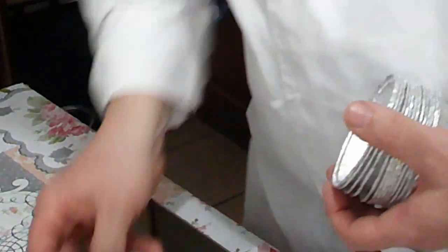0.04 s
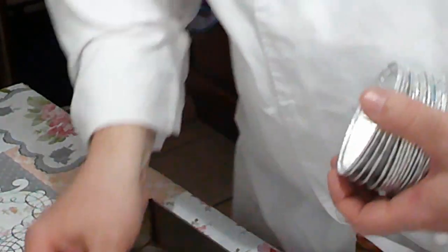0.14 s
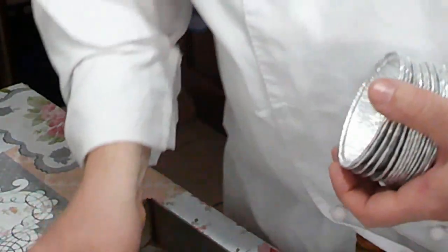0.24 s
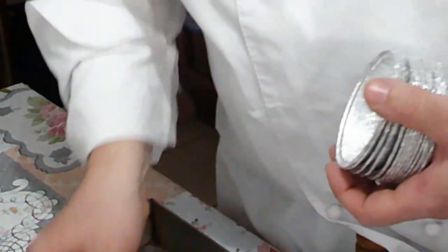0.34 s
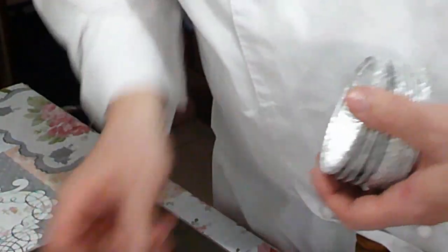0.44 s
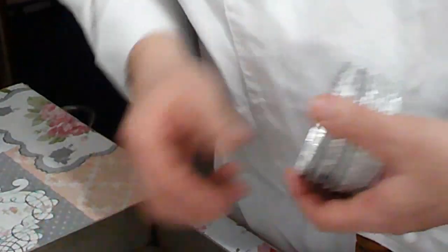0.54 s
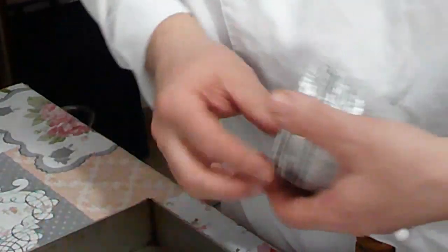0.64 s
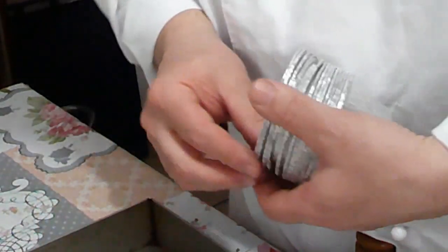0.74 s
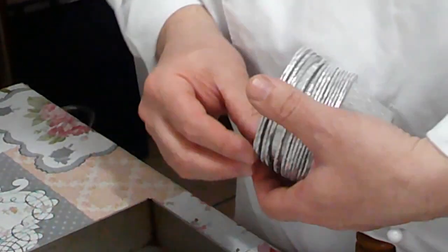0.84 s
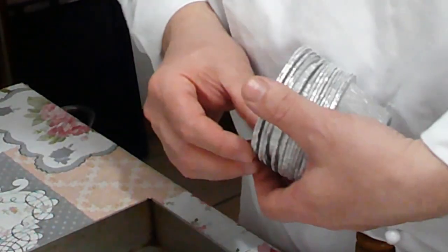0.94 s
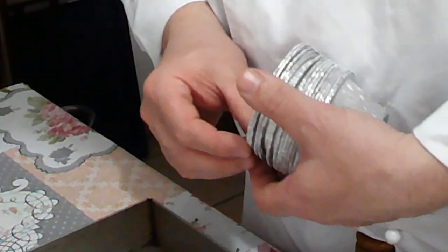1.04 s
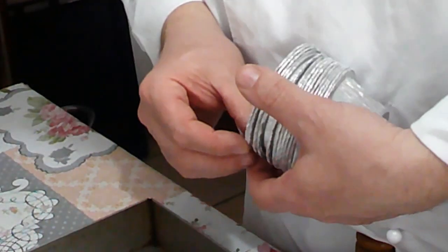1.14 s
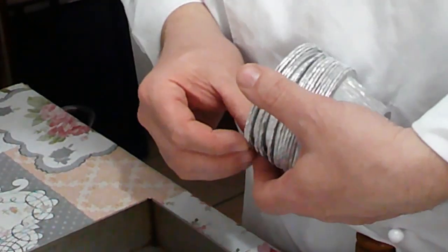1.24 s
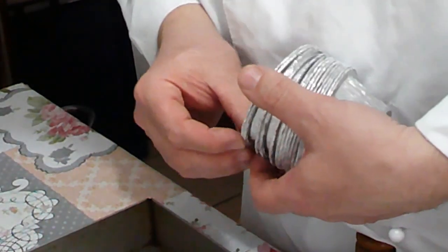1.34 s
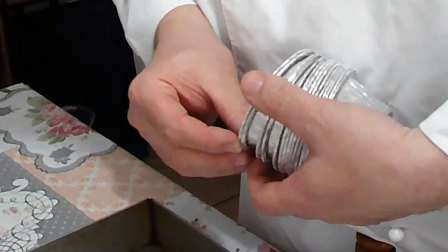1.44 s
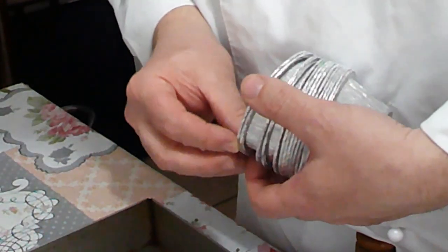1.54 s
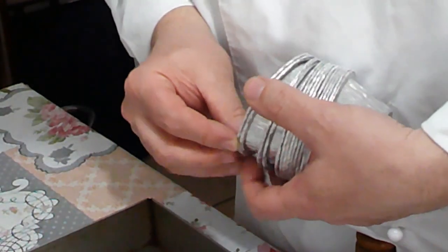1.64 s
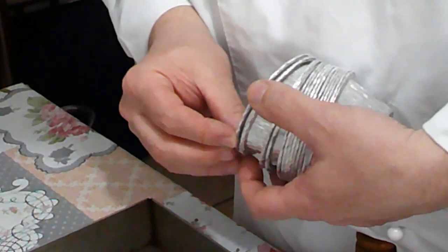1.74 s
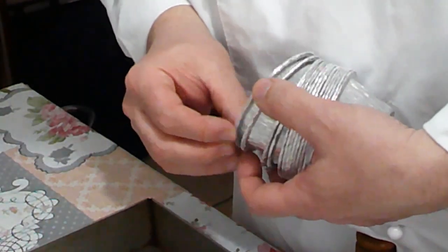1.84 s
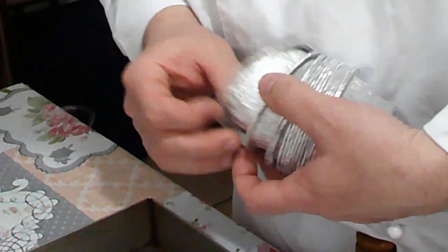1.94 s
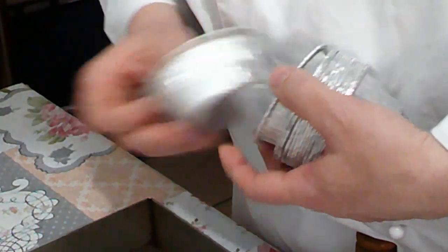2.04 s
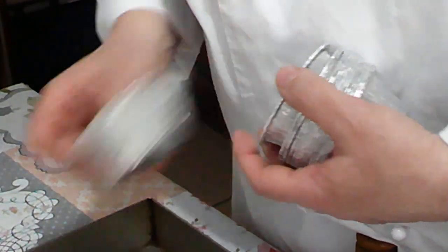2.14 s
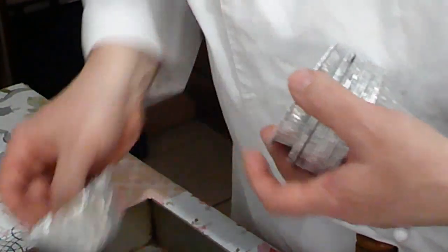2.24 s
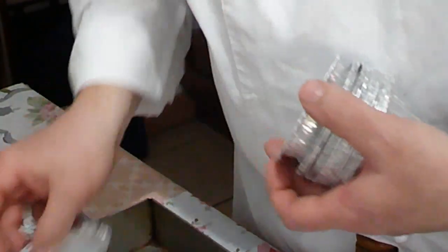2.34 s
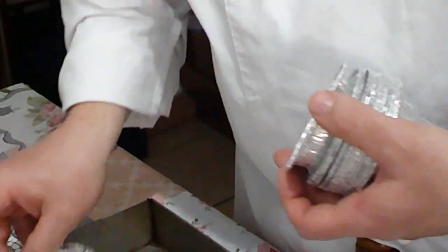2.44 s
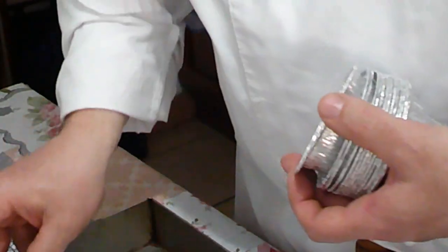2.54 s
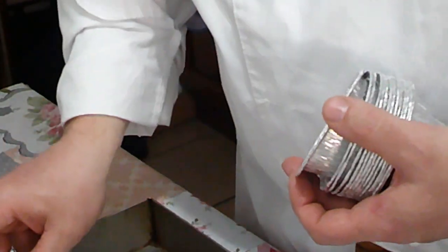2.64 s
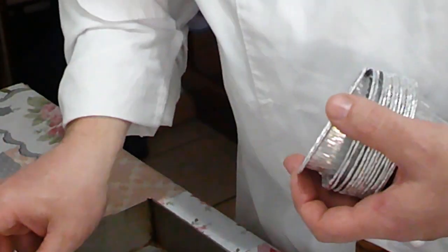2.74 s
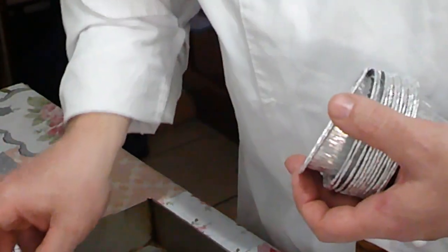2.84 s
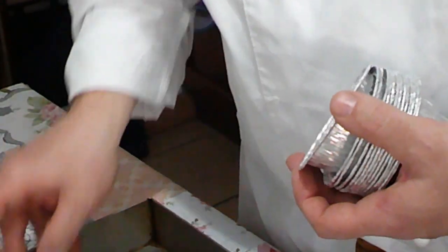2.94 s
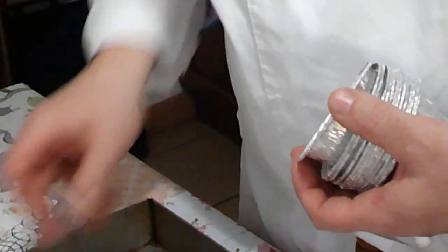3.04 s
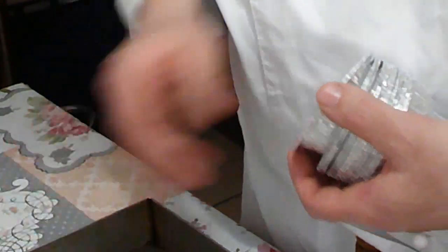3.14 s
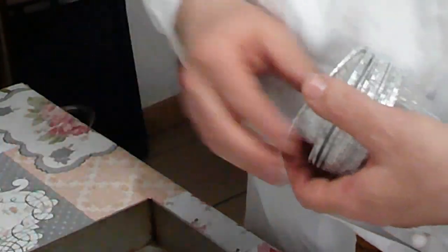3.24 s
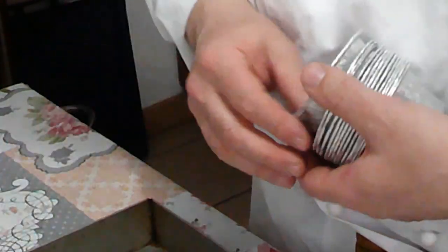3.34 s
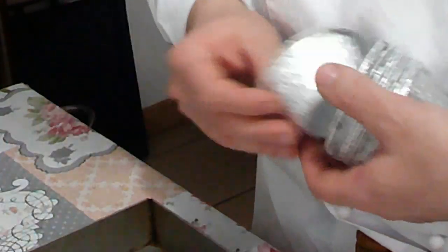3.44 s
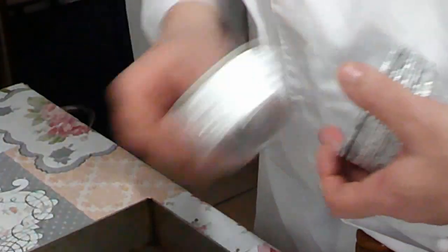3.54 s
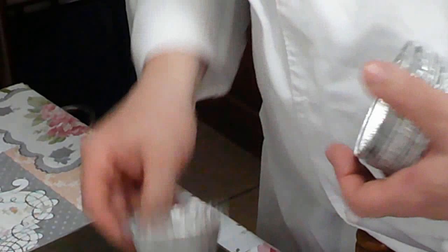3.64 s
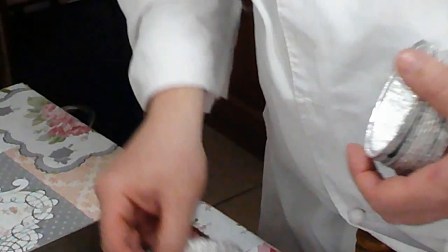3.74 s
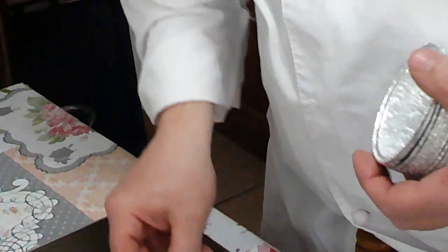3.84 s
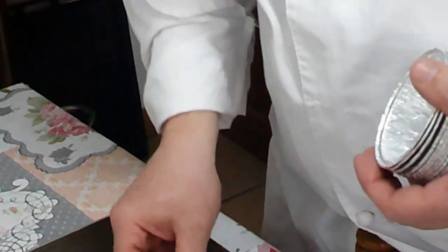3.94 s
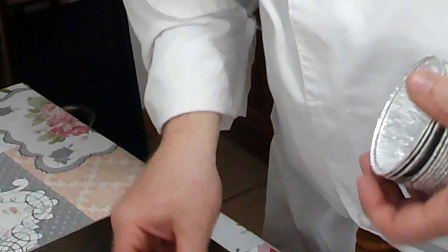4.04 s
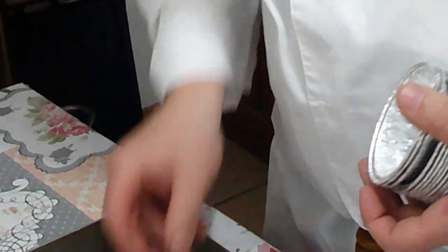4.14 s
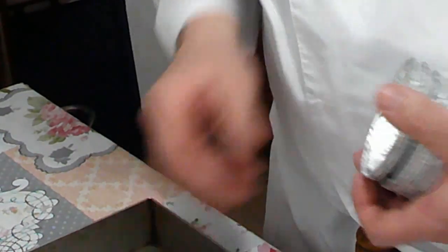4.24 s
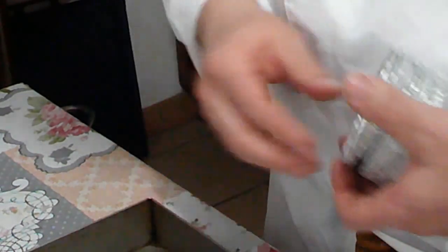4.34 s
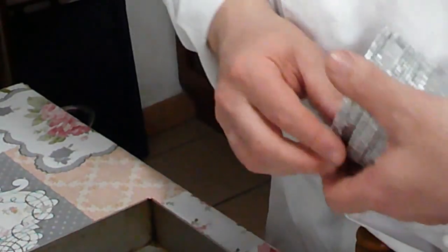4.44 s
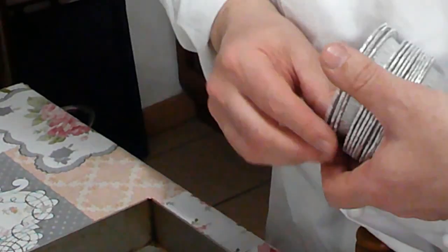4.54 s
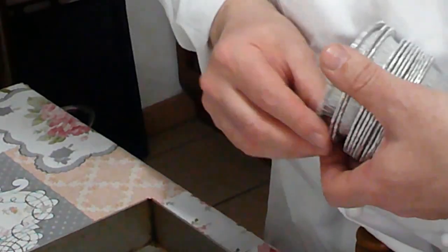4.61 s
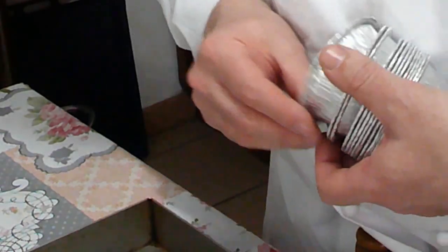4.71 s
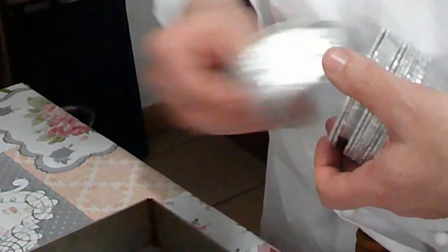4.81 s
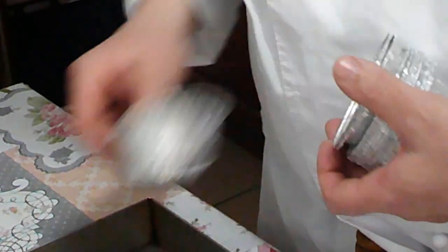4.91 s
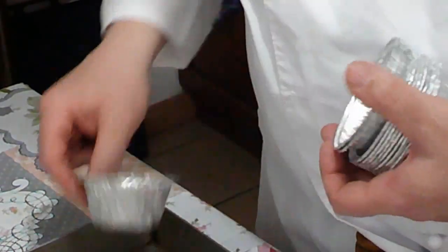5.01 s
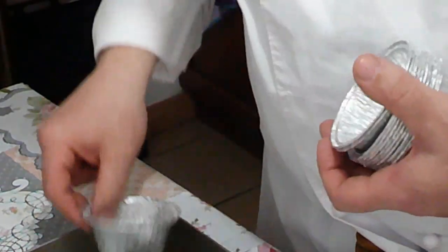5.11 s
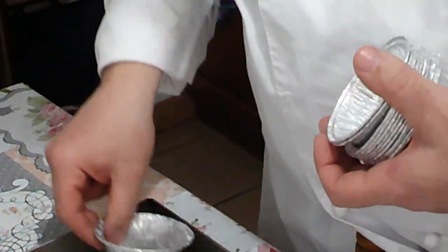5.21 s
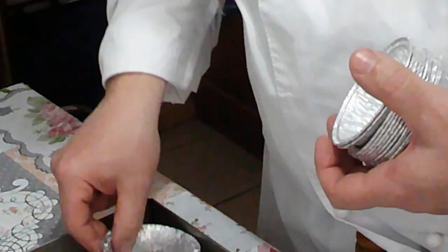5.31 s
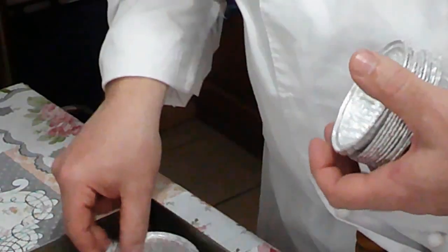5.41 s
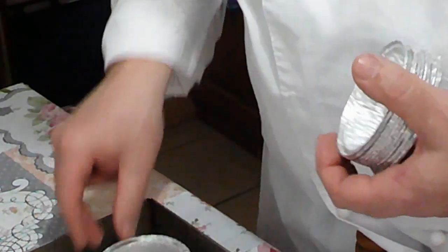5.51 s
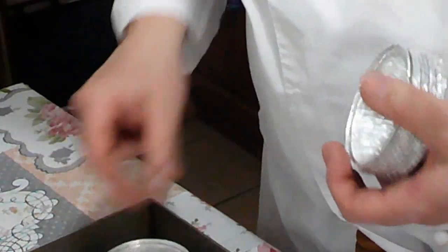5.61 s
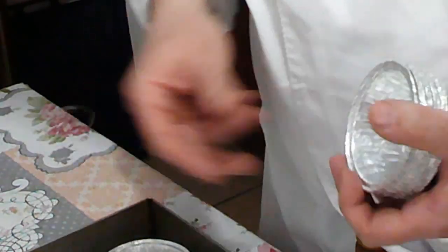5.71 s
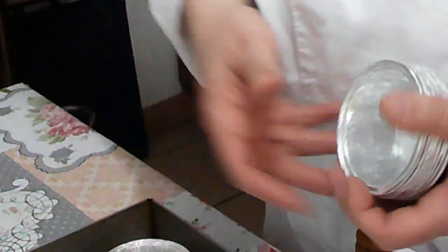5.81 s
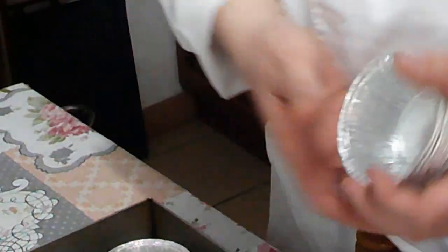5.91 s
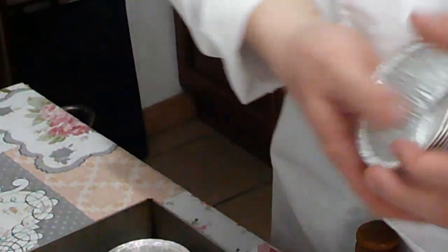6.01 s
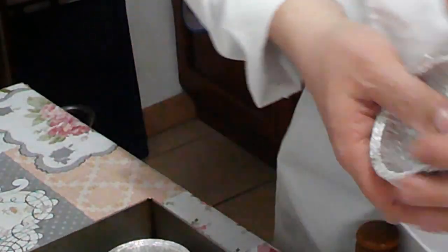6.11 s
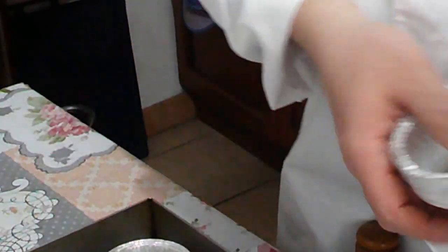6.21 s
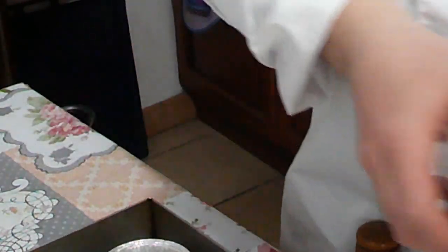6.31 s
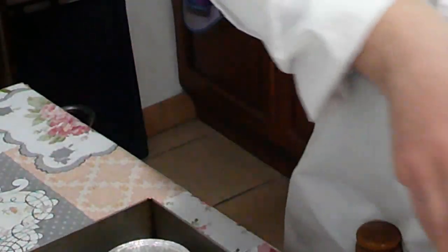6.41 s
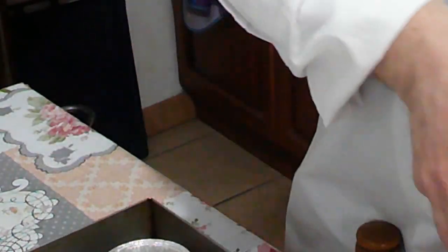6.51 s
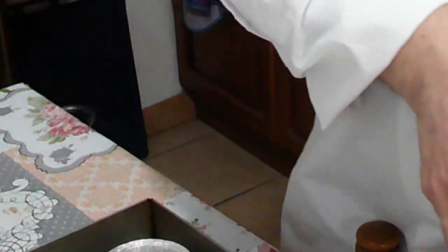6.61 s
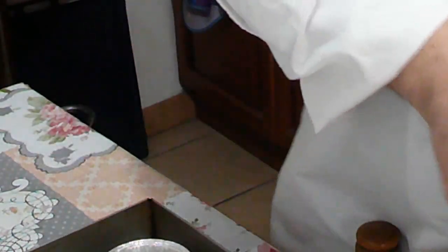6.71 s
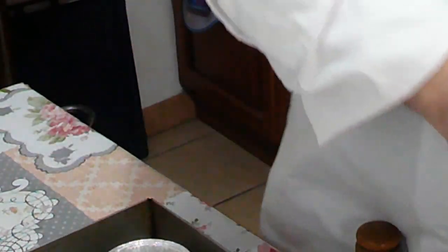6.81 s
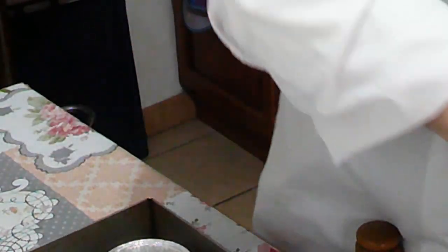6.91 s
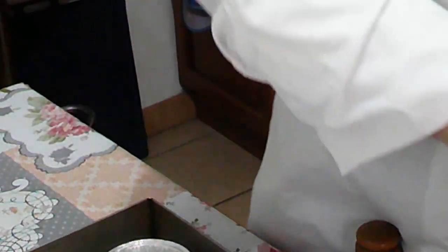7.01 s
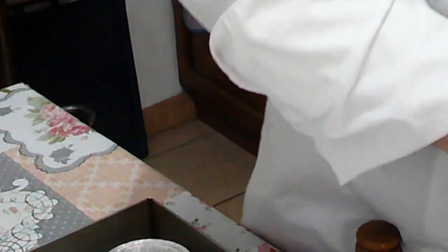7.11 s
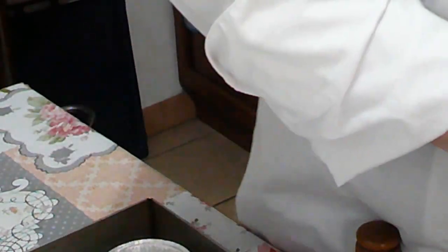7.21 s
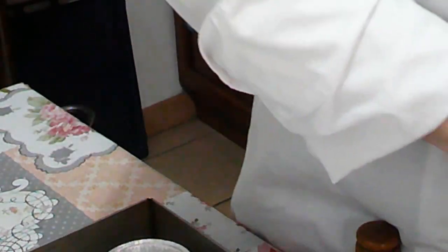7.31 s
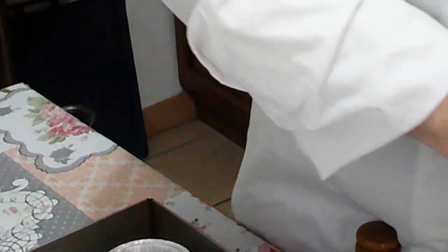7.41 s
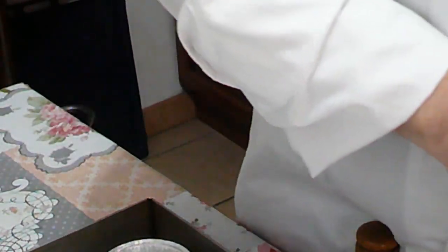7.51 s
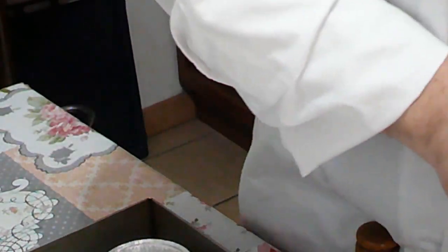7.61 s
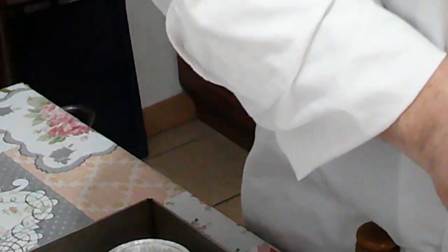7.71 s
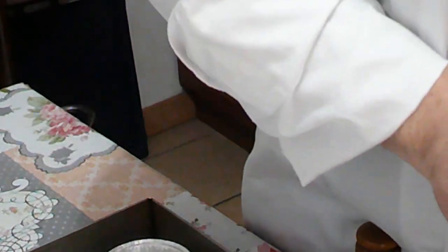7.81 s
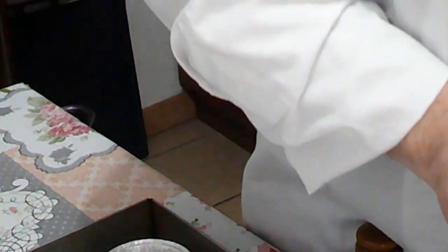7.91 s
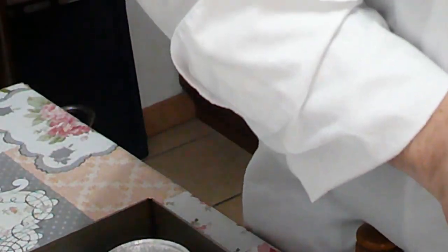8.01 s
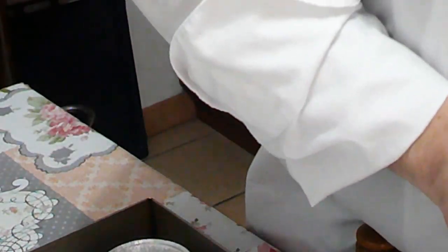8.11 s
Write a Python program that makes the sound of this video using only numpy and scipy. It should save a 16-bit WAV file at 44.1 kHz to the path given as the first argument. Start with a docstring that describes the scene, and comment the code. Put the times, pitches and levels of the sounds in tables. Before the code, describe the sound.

A small, quiet kitchen heard close up, with dull room air, slight hiss, a faint low-mid appliance hum and rounded treble. Foil rubs softly, then at 0.3 s a thin cup hits a metal tray with a bright, tinny crack and short rattle. From 0.65 s fingertips tick over nested rims, with a tiny rising squeak near 0.8 and gentle scraping. More flicks lead to a cup springing free at 2.0 with a soft, rattly ring. Softer clinks fall at 2.7 and 4.0, with a crinkle, scrape and squeak around 3.3 and a sharp tick at 4.8. The strongest clink comes at 5.4, rattling longer, followed by crisp crinkles at 5.6 and 6.1. A sleeve brushes softly around 6.6 to 7.0; small foil crackles at 7.6 and 7.85 end it.

```python
"""Foil baking cups dropped into a metal tray

A cook peels thin foil cups off a stack: fingers tick, scrape and squeak on the nested rims (clicks and tones).
Each cup blow is a noisy crack, a short rattle and its own ring of decaying modes; one cup springs free of the stack.
Then the stack is put aside with a few crinkles (bursts of clicks) and a brush of the sleeve (filtered rubbing).
A small kitchen reflects it all over room air, hiss and a faint appliance hum."""
import sys
import numpy as np
from scipy import signal
from scipy.fft import rfft, irfft
from scipy.io import wavfile

SR = 44100
rng = np.random.default_rng(int(sys.argv[2]) if len(sys.argv) > 2 else 0)


def persist_wave(psi):
    """Save psi, clipped to +-1, as 16-bit WAV."""
    counts = np.round(np.clip(psi, -1, 1) * 32767).astype(np.int16)
    wavfile.write(sys.argv[1], SR, np.atleast_2d(counts).T)


N = 359856
TIME = np.arange(N) / SR

# Resonances of each cup against the tray, then of one springing free: pitch_hz, width_hz, level_db
MODES_A = [(1040, 68, -18), (1404, 55, -21), (1534, 40, -13), (1885, 14, -11), (2515, 140, 0),
           (2860, 22, -22), (3360, 29, -14), (4200, 40, -20)]
MODES_B = [(1285, 77, -6), (1520, 52, 5), (1690, 20, -13), (1930, 53, -4), (2314, 25, -7.5),
           (2420, 38, -22), (3310, 74, -26)]
MODES_C = [(872, 34, -12), (1227, 29, -10), (1604, 160, 7), (2070, 100, -4.5), (2540, 22, -10),
           (3180, 44, -9), (3410, 62, -11), (4054, 35, -7)]
MODES_D = [(1087, 45, 6), (1558, 44, 4), (2243, 33, 0), (2420, 65, -5), (2940, 44, -8), (3220, 20, -28),
           (3760, 50, -16), (4000, 79, -22)]
MODES_FREE = [(1230, 130, -2), (1796, 41, -9), (2200, 22, -1.5), (2630, 76, -9)]
# Broad colour of the pleated foil in each of these blows: pitch_hz, level_db
FOIL_A = [(180, -68), (300, -17), (439, -20), (478, -16.5), (721, -11.5), (970, 0), (1200, -4.5),
          (1400, -1), (1990, -9), (2500, -10), (3370, -8.5), (4720, -24.5), (7320, -20.5), (8800, -40.5),
          (11400, -85), (19400, -120)]
FOIL_B = [(150, -56), (250, -26), (861, -17), (1200, 1.5), (1350, -13.5), (1790, 0), (2110, -17),
          (2270, -9.5), (2790, -22), (3190, -14.5), (4780, -32), (5890, -33.5), (7700, -41), (8800, -54),
          (11400, -92), (19400, -120)]
FOIL_C = [(120, -67), (200, -31), (365, -21), (819, -6.5), (900, -11), (1340, -5), (1590, -4.5),
          (1810, -13), (2440, -10), (3300, -13.5), (3800, -21), (4180, -21), (5140, -28), (7390, -20),
          (8800, -40), (11400, -75), (19400, -120)]
FOIL_D = [(260, -47), (450, -33), (584, -16.5), (892, -12), (1090, -8.5), (1200, -15), (1520, -9),
          (2030, -16), (2180, -9.5), (2600, -20.5), (2980, -19), (4720, -34), (7300, -31), (8800, -48),
          (11400, -85), (19400, -120)]
FOIL_FREE = [(120, -64), (200, -36), (421, -9.5), (832, -15.5), (929, -13), (1780, -3.5), (2020, -9),
             (2640, -10), (7050, -32.5), (8800, -42), (11400, -78), (19400, -120)]
# Blows of the cups; rattle is relative to the crack, ring and room are mix levels before the blow is levelled:
# start_s, level_db, rattle_db, rattle_t60_s, ring_db, ring_t60_s (wide modes die sooner), room_db, colour, modes
CLINKS = [ (0.2644, -25.5, -5.5, 0.16, -3.5, 0.14, -1.5, FOIL_A, MODES_A),
          (1.9992, -36, 4.5, 0.096, -12.5, 0.74, -6.5, FOIL_FREE, MODES_FREE),
          (2.689, -28.5, -8.5, 0.095, -9, 0.16, -5, FOIL_B, MODES_B),
          (4.0256, -28.5, -2, 0.13, -1, 0.15, -5.5, FOIL_C, MODES_C),
          (5.4057, -23.5, -5.5, 0.44, -4, 0.27, -11, FOIL_D, MODES_D)]
# The rattle starts this late at 0 dB; the sooner the rim comes back, the stronger it chatters
REBOUND_S, REBOUND_HALVING_DB = 0.008, 10


def clinks(crack_s=0.0066, build_s=0.0013, tone_room=0.32, body_db=-2):
    """Each blow cracks the thin wall; the rim chatters on, and the cup rings."""
    out = np.zeros(N)
    t = TIME[:SR * 3 // 4]
    for start, db, rattle_db, rattle_t60, ring_db, ring_t60, room_db, foil, modes in CLINKS:
        delay = REBOUND_S * .5 ** (rattle_db / REBOUND_HALVING_DB)
        crack = grains(len(t), rate=9000, spread_db=3.5) * np.exp(-(t / crack_s) ** 2)
        chatter = grains(len(t), rate=1500, spread_db=2.5)
        rattle = chatter * (t > delay) * fade(np.abs(t - delay), rattle_t60)
        wall = colour(crack + undb(rattle_db) * rattle, foil)
        contact = 0.81 * wall + undb(body_db) * resonate(wall, modes)
        tone = undb(ring_db) * ring(t, modes, ring_t60) * (1 - np.exp(-t / build_s))
        reflections = kitchen(1.49 * contact + tone_room * tone)
        blow = contact + tone + undb(room_db) * reflections
        add(out, start, undb(db) * blow / np.std(blow[:SR // 10]))  # level over the first tenth of a second
    return out


def ring(t, modes, t60, split_db=-11, broad_hz=400):
    """Decaying modes of a cup; the uneven pleats give each two weak neighbours that beat against it."""
    out = 0
    weights = undb([split_db, 0, split_db])
    for hz, width, db in modes:
        offsets = width * np.array([-1, 0, 1]) * rng.uniform(.5, 1, len(weights))
        phases = rng.random((len(weights), 1))  # in turns
        waves = np.sin(2 * np.pi * ((hz + offsets)[:, None] * t + phases))
        decay = fade(t, t60 / (1 + width / broad_hz))  # wide modes die sooner
        out = out + undb(db) * weights @ waves * decay
    return np.sqrt(2) * out / np.linalg.norm(undb(np.array(modes)[:, 2]))


def resonate(x, modes, widen=1.02):
    """What a cup's resonances pick out of a sound, all at equal peak gain."""
    return sum(signal.lfilter(*signal.iirpeak(hz, hz / (widen * width), fs=SR), x) for hz, width, _ in modes)


# Fingertip flicking one rim, or running over several: start_s, run_length_s, level_db, pitch_hz
FLICKS = [(0.648, 0.09, -38.5, 964), (0.672, 0, -35, 1995), (1.644, 0.035, -38, 950),
          (1.709, 0, -35.5, 985), (1.852, 0, -38, 1920), (1.925, 0, -32.5, 974), (2.596, 0, -36, 1800),
          (3.441, 0, -40, 1960), (3.713, 0, -37.5, 920), (4.408, 0, -38, 1790), (4.78, 0, -28, 990),
          (5.091, 0, -34.5, 940), (5.255, 0, -41, 920), (6.471, 0, -36, 880), (7.541, 0, -46, 1170)]
# Colour of loose pleats: pitch_hz, level_db
PLEATS = [(290, -44.5), (500, -11), (604, -3), (716, -14.5), (865, -2), (1420, -3), (1860, -5.5),
          (3090, -6.5), (5400, -29), (7020, -54), (11900, -120)]
# Treble colour of rubbing foil, shared by the handling sounds: pitch_hz, level_db
STACK_HISS = [(2470, -43), (4200, -8.5), (5280, 0), (7130, 5), (7870, -0.5), (8800, -15), (11400, -58),
              (19400, -120)]
# Time from rim to rim; shares by which gap and pitch vary
RIM_GAP_S, RIM_GAP_SCATTER, RIM_DETUNE = 0.024, 0.15, 0.057


def ticks(t60=0.032, snap_t60=0.083, attack_s=0.00036, pip_db=-1, body_db=-13.25, hiss_db=-26.5):
    """Each rim that the fingertip passes gives a damped pip under a dry snap."""
    out = np.zeros(N)
    t = TIME[:SR // 8]
    for start, length, db, hz in FLICKS:
        for rim in range(1 + int(length / RIM_GAP_S)):
            late, detune = rng.standard_normal(2) * (rim > 0)  # the first rim is exact
            pitch = hz * (1 + RIM_DETUNE * detune)
            pip = np.sin(2 * np.pi * pitch * t) * fade(t, t60) * (1 - np.exp(-t / attack_s))
            snap = grains(len(t), rate=4300, spread_db=2.5) * fade(t, snap_t60)
            body = undb(body_db) * colour(snap, PLEATS)
            hiss = undb(hiss_db) * colour(snap, STACK_HISS)
            moment = start + RIM_GAP_S * (rim + RIM_GAP_SCATTER * late)
            add(out, moment, undb(db) * (undb(pip_db) * pip + body + hiss))
    return out


# Strokes of foil sliding on foil: start_s, length_s, level_db, lower_resonance_hz
SLIDES = [(0.822, 0.054, -48, 1010), (1.219, 0.087, -54, 1000), (1.861, 0.12, -50, 1010),
          (2.588, 0.11, -53, 990), (3.251, 0.032, -41, 960), (5.03, 0.099, -54, 980),
          (6.012, 0.18, -47.5, 1400), (6.34, 0.21, -54, 1415), (7.826, 0.084, -47.5, 1380)]
# Colour of the nested stack: pitch_hz, level_db
STACK = [(410, -43), (700, -25.5), (821, -11), (903, -3), (1050, -8.5), (1450, -8.5), (2000, -10.5),
         (2770, -17.5), (3220, -16.5), (5020, -27), (7050, -32.5), (7830, -28.5), (8800, -43.5),
         (11400, -45.5), (19400, -120)]


def slides(body_db=-5, tone_db=-6.0, hiss_db=-20):
    """Pleats catch and slip on each other: small clicks ring the stack at a pitch set by the grip."""
    out = np.zeros(N)
    for start, length, db, hz in SLIDES:
        count = int(length * SR)
        slips = grains(count, rate=1100, spread_db=3.2)
        scrape = undb(body_db) * colour(slips, STACK) + undb(hiss_db) * colour(slips, STACK_HISS)
        tone = undb(tone_db) * stack_tone(slips, hz)
        add(out, start, undb(db) * signal.windows.tukey(count, .5) * (scrape + tone))
    return out


# The stack's second resonance against its first
UPPER_RATIO, UPPER_DB = 1.94, -5


def stack_tone(slips, hz, sharpness=13):
    """The two resonances of the nested cups, about an octave apart."""
    def resonance(f):
        makeup = np.sqrt(sharpness * SR / (np.pi * f))  # offsets the loss in a narrow band
        return makeup * signal.lfilter(*signal.iirpeak(f, sharpness, fs=SR), slips)
    return resonance(hz) + undb(UPPER_DB) * resonance(hz * UPPER_RATIO)


# Fingers take a new hold on the stack, and the rubbing dies down: peak_s, level_db, t60_s
GRIPS = [(0.02, -52, 0.76), (0.68, -53, 2.3), (1.28, -55, 3.2), (1.67, -52.5, 1.2), (2.13, -52.5, 1.4),
         (3.4, -54, 2.2), (4.44, -52, 2.5), (4.71, -53.5, 1.5)]
# Time constant of taking hold; level of the rubbing under a steady hand, before the mix of its layers
GRIP_BUILD_S, HOLD_DB = 0.04, -63.5


def grip(body_db=-2, hiss_db=-21, tone_db=-11, stack_hz=1010, patchy_db=2):
    """Nested cups rub faintly the whole time, most around each new hold."""
    holds = sum(surge(s, db, GRIP_BUILD_S, t60) ** 2 for s, db, t60 in GRIPS)
    effort = np.sqrt(undb(HOLD_DB) ** 2 + holds)
    slips = grains(N, rate=1500, spread_db=-0.5) * undb(patchy_db * wander(40)) * effort
    scrape = undb(body_db) * colour(slips, STACK) + undb(hiss_db) * colour(slips, STACK_HISS)
    return scrape + undb(tone_db) * stack_tone(slips, stack_hz)


# One rim singing as it drags out of the next: start_s, length_s, level_db, start_pitch_hz, rise_hz_per_s
SQUEAKS = [(0.818, 0.042, -49, 920, 2500), (3.257, 0.092, -47.5, 888, 0), (4.785, 0.123, -51.5, 1063, 900)]
SQUEAK_EDGE_SHARE = 0.37  # share of its length spent swelling and fading


def squeak():
    """Stick-slip between two rims locks briefly into an unsteady tone, steady or rising as the grip tightens."""
    out = np.zeros(N)
    waver = 1 + .015 * wander(300)
    flutter = undb(2.5 * wander(120))
    for start, length, db, hz, rise in SQUEAKS:
        span = (TIME >= start) & (TIME < start + length)
        pitch = (hz + rise * (TIME[span] - start)) * waver[span]
        level = undb(db) * signal.windows.tukey(len(pitch), SQUEAK_EDGE_SHARE) * flutter[span]
        add(out, start, level * np.sin(2 * np.pi * np.cumsum(pitch) / SR))
    return out


# Loose foil buckling and settling, level before the final mix: peak_s, level_db, build_s
CRINKLES = [(1.976, -43.5, 0.055), (2.591, -49, 0.0045), (3.275, -40, 0.013), (3.689, -50, 0.039),
            (3.887, -49.5, 0.002), (5.277, -52, 0.0099), (5.602, -36, 0.0043), (5.646, -36.5, 0.0014),
            (6.092, -37, 0.0068), (7.592, -42, 0.0047), (7.62, -40.5, 0.0088), (7.85, -40.5, 0.0033)]
# A slow build-up also takes longer to settle and, being a peeling of pleats, hisses more
SETTLE_T60_S, SETTLE_PER_BUILD = 0.11, 3.3
CRINKLE_TREBLE_DB, PEEL_TREBLE_DB_PER_S = -4, 98


def crinkles(hiss_db=-11):
    """Pleats give way in a quick avalanche of clicks that builds up and dies off."""
    body, hiss = 0, 0
    for peak_s, db, build_s in CRINKLES:
        strain = surge(peak_s, db, build_s, SETTLE_T60_S + SETTLE_PER_BUILD * build_s)
        body = body + strain
        hiss = hiss + strain * undb(CRINKLE_TREBLE_DB + PEEL_TREBLE_DB_PER_S * build_s)
    clicks = grains(N, rate=2500, spread_db=0.0)
    return colour(clicks * body, PLEATS) + undb(hiss_db) * colour(clicks * hiss, STACK_HISS)


# Sleeve swings, swelling and fading evenly about their fastest moment, level before the mix:
# peak_s, level_db, swell_s (time constant)
SWINGS = [(6.58, -53, 0.027), (6.745, -44.5, 0.12), (7.23, -68, 0.069)]
# Colour of the cloth: pitch_hz, level_db
CLOTH = [(180, -50), (300, -16), (331, -15), (392, -19), (513, -9), (1010, -5), (1550, -7), (1780, -2.5),
         (4720, -20), (7020, -21.5), (8800, -42), (11400, -69), (19400, -120)]
SLEEVE_TOUCH_S = 6.565  # the cloth first makes contact


def sleeve(db=-1, catch_db=-7, hiss_db=-46):
    """Cotton fibres rub in a fine, uneven stream, hissing even when slow, with sparser catches of the folds."""
    fibres = grains(N, rate=3000, spread_db=2) * undb(1.5 * wander(60))
    folds = grains(N, rate=120, spread_db=2.5)
    speed = sum(undb(peak_db) * np.exp(-np.abs(TIME - s) / swell_s) for s, peak_db, swell_s in SWINGS)
    rub = undb(db) * colour(fibres + undb(catch_db) * folds, CLOTH) * speed
    hiss = undb(hiss_db) * colour(fibres, STACK_HISS) * np.sqrt(speed)
    return (rub + hiss) * (TIME > SLEEVE_TOUCH_S)


# Colour of the kitchen air: pitch_hz, level_db
AIR = [(12, -40), (20, -10.5), (71, -10), (135, -6.5), (242, -9.5), (327, -5.5), (396, -11), (423, -7.5),
       (917, -14.5), (1240, -15.5), (1470, -22.5), (3400, -27), (4420, -54.5), (7480, -120)]
# Colour of the steady hiss: pitch_hz, level_db
HISS = [(2120, -43.5), (3600, -7), (4490, -8), (5100, -6), (7220, -4), (8800, -15), (11400, -65),
        (19400, -120)]
# Appliance hum, rms level before the trim: pitch_hz, level_db
HUM = [(328.4, -68.5), (425.3, -66)]


def background(air_db=-56, hiss_db=-77, hum_trim_db=-2, waver_hz=5):
    """Steady room air and faint hiss are coloured noise; the appliance hum is wavering sines."""
    air = undb(air_db) * colour(rng.standard_normal(N), AIR, size=8192)
    hiss = undb(hiss_db) * colour(rng.standard_normal(N), HISS)
    hum = 0
    for hz, db in HUM:
        level = undb(db + 2 * wander(5.6))
        pitch = hz + waver_hz * wander(20)
        hum = hum + level * np.sin(2 * np.pi * np.cumsum(pitch) / SR)
    return air + hiss + np.sqrt(2) * undb(hum_trim_db) * hum


ROOM_T60_S, ROOM_TREBLE_T60_S = 0.39, 0.36


def kitchen(x, first_s=0.0048, split_hz=3000):
    """Dense reflections off near walls and cupboards, at unit energy."""
    t = TIME[:SR * 3 // 4]
    echoes = rng.standard_normal(len(t)) * np.clip(t / first_s - 1, 0, 1)
    low = signal.sosfilt(signal.butter(2, split_hz, fs=SR, output="sos"), echoes)
    shuffled = rng.permutation(echoes)  # without the onset gap: treble reflects at once
    high = signal.sosfilt(signal.butter(2, split_hz, "high", fs=SR, output="sos"), shuffled)
    response = low * fade(t, ROOM_T60_S) + high * fade(t, ROOM_TREBLE_T60_S)
    return signal.fftconvolve(x, response / np.linalg.norm(response))[:len(x)]


def grains(count, rate, spread_db):
    """Tiny buckling clicks at random moments, rate per second, their sizes skewed by spread_db; rms 1."""
    size = undb(spread_db * np.minimum(rng.exponential(size=count), 4))
    return unit((rng.random(count) < rate / SR) * size * rng.choice([-1, 1], count))


def surge(peak_s, db, build_s, t60):
    """Gain that builds up exponentially to a peak and dies away."""
    t = TIME - peak_s
    return undb(db) * np.exp(np.minimum(t, 0) / build_s) * fade(np.maximum(t, 0), t60)


def wander(rate):
    """Slow random drift with a spread near 1, through rate random points per second."""
    knots = rng.standard_normal(int(N / SR * rate) + 2)
    return np.interp(TIME * rate, np.arange(len(knots)), knots)


def colour(x, points, size=2048):
    """Minimum-phase filter of unit power gain through (pitch_hz, level_db) points."""
    hz, db = np.transpose(points)
    grid = np.maximum(np.arange(size // 2 + 1) * SR / size, 1)
    gain = unit(undb(np.interp(np.log(grid), np.log(hz), db)))
    cepstrum = irfft(np.log(gain))
    cepstrum[1:size // 2] *= 2  # folding the cepstrum makes the filter causal
    cepstrum[size // 2 + 1:] = 0
    return signal.fftconvolve(x, irfft(np.exp(rfft(cepstrum))))[:len(x)]


def fade(t, t60):
    """Exponential decay that loses 60 dB in t60 seconds."""
    return np.exp(-np.log(1000) * t / t60)


def undb(db):
    """Decibels to gain."""
    return 10 ** (np.asarray(db) / 20)


def unit(x):
    """Scale to rms 1."""
    return x / np.sqrt(np.mean(x ** 2))


def add(track, start, x):
    """Mix a sound into a track at a time in seconds."""
    i = max(int(start * SR), 0)
    track[i:i + len(x)] += x[:N - i]


def scene(near_room_db=-8, loose_room_db=-4, loose_db=-0.5):
    """Cups in the tray and handling noises in one kitchen; the fingers on the stack are drier than loose foil."""
    near = ticks() + slides() + grip() + squeak()
    loose = crinkles() + sleeve()
    room = kitchen(undb(near_room_db) * near + undb(loose_room_db) * loose)
    return (clinks() + near + undb(loose_db) * loose + room + background())[None]


def record(dry):
    """A narrow audio band: two low-pass filters round off the treble, then cut it steeply."""
    rounded = signal.sosfilt(signal.butter(10, 8300, fs=SR, output="sos"), dry)
    return signal.sosfilt(signal.ellip(8, .3, 60, 8750, fs=SR, output="sos"), rounded)


dry = scene()
out = record(dry)
persist_wave(out)
```